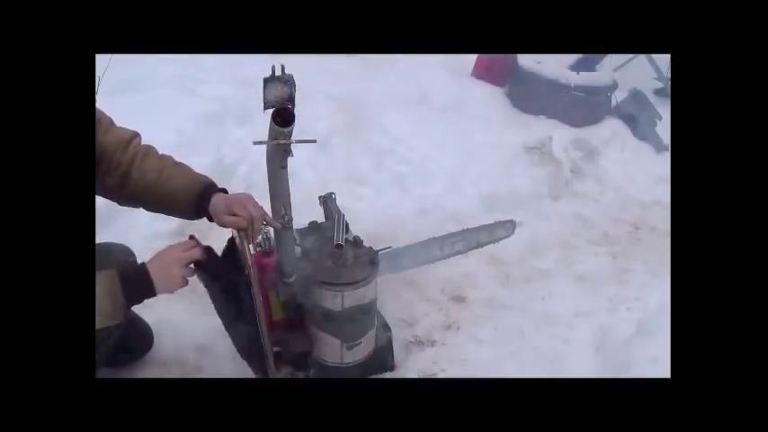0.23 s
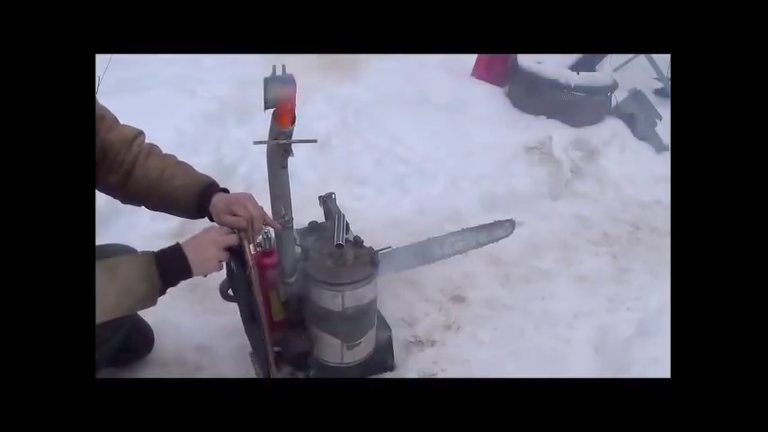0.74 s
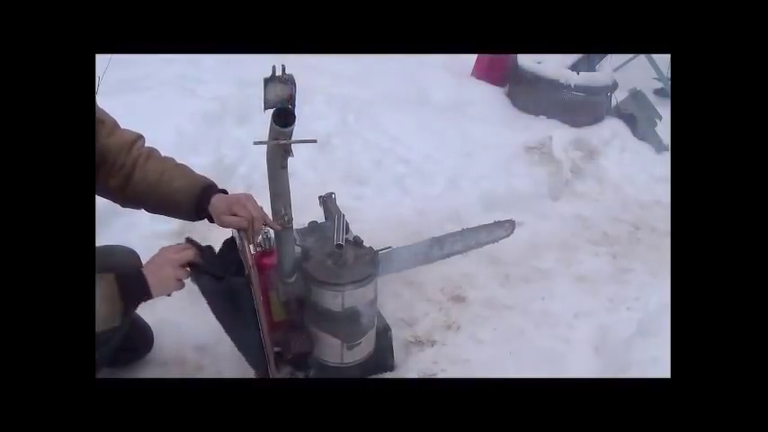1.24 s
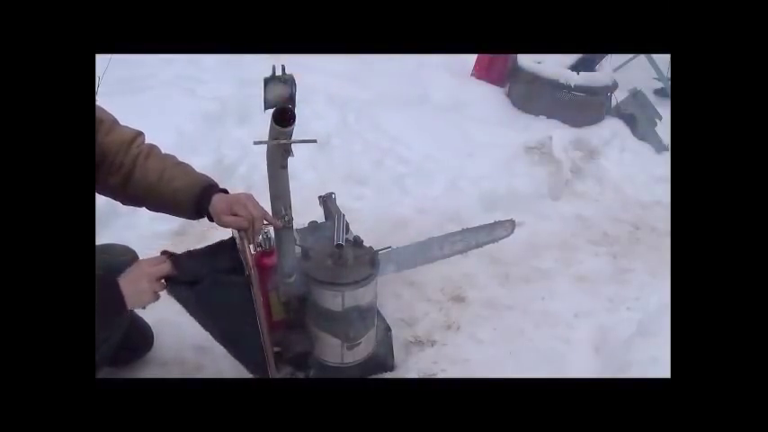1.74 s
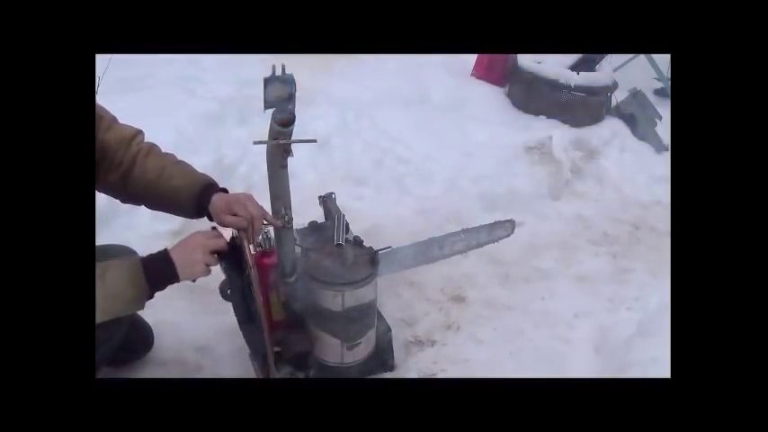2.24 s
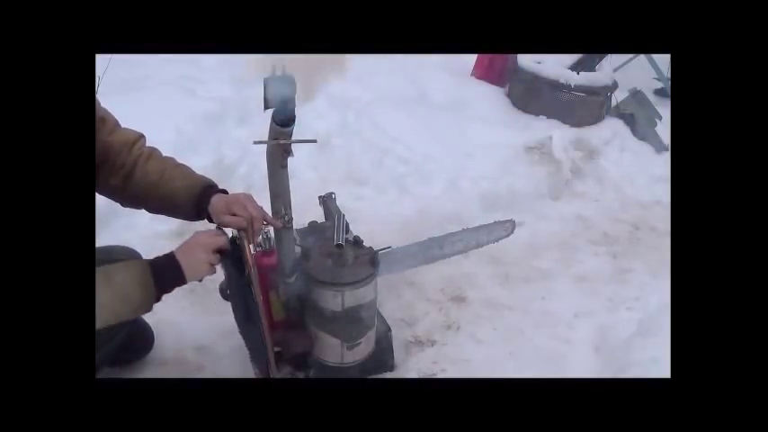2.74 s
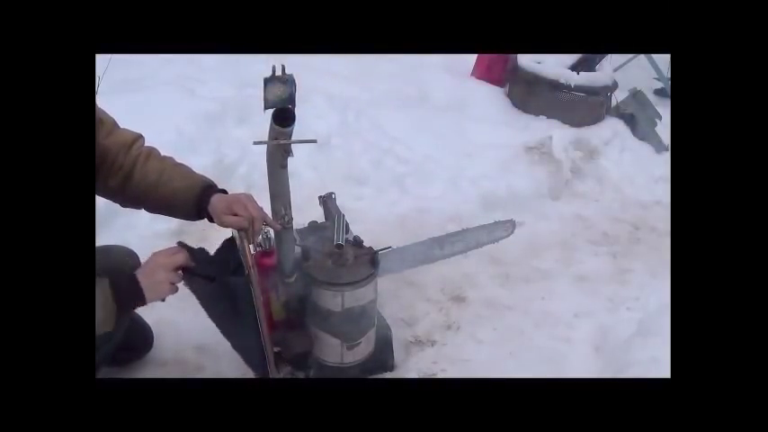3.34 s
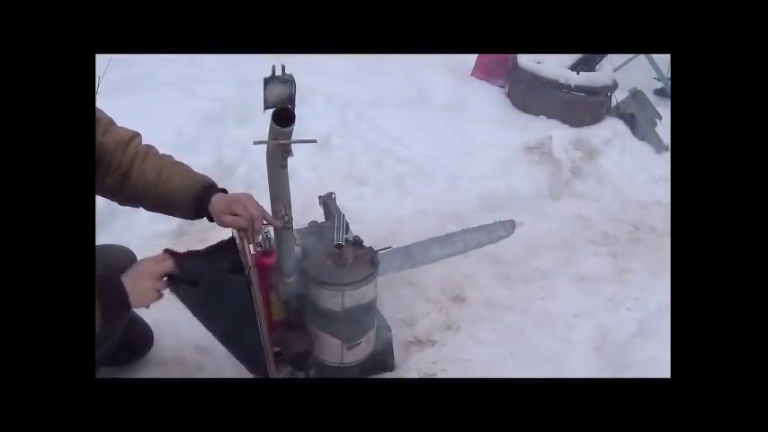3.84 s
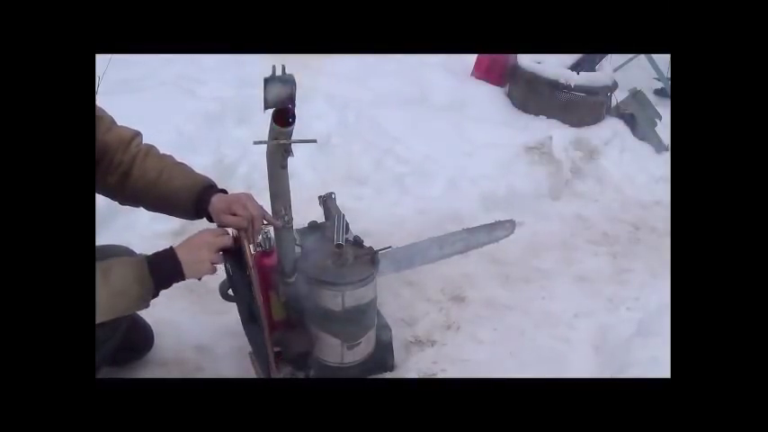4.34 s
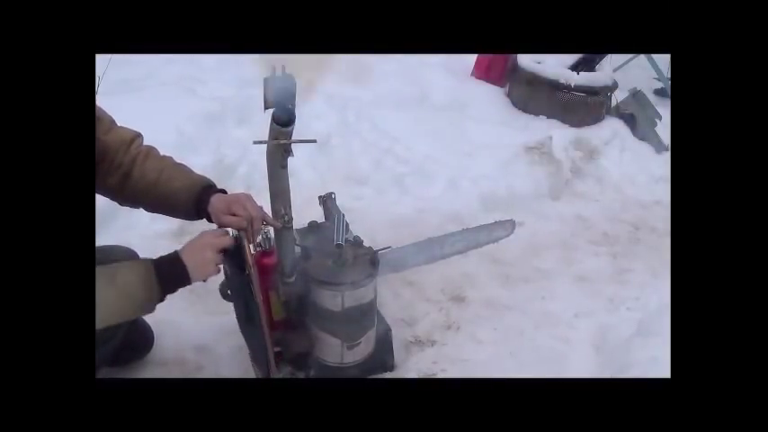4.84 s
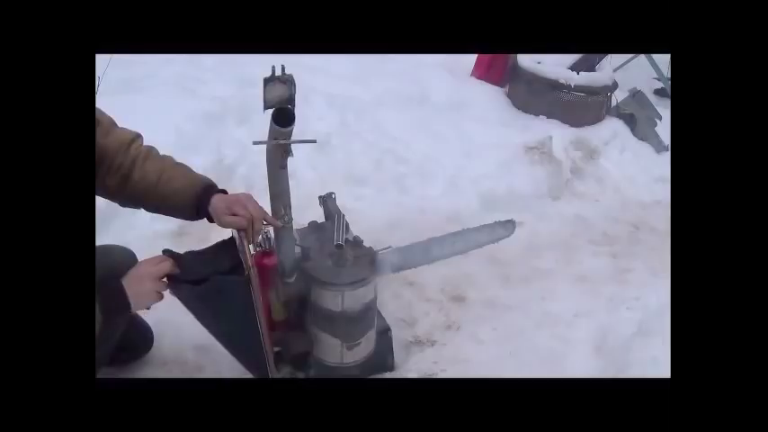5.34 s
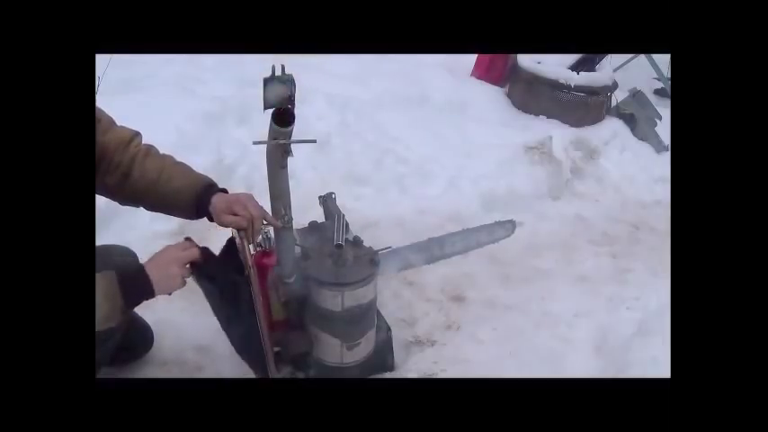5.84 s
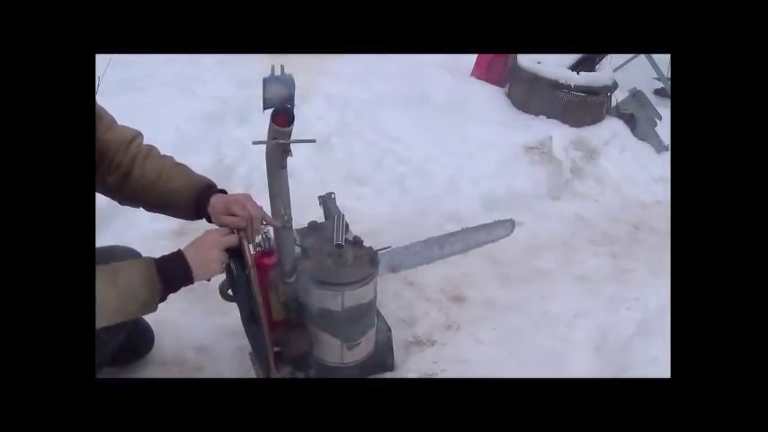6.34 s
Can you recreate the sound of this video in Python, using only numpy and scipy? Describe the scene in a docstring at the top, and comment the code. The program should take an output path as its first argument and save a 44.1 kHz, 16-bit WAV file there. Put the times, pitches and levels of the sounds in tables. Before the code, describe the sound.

Steady pumping of leathery cloth bellows beside a burning stove in quiet open air. Short, rough whooshes with a low fire rumble alternate with lighter sucking breaths of air, flap slaps, dry cloth snaps and small metallic clicks. A brief airy hoot from the pipe follows every blast, and a few dry ember cracks stand out, one strongest near the middle. Close two-channel microphone, slightly wide, no echo, faint hiss between strokes.

```python
"""The roar of a dying air blast comes first, with a hoot from the flue and a cracking ember.
Hand bellows feed a small steel stove in open air, about one stroke every 0.7 s: shaped noise is the air and fire.
On each pull the flap claps, air is drawn in, and the cloth snaps out and pulls taut; on the turn the fittings click.
On each squeeze the cloth folds and the jet roars again. These contacts are short clicks ringing decaying modes."""
import sys
import numpy as np
from scipy import signal
from scipy.fft import rfft, irfft, next_fast_len
from scipy.io import wavfile

SR = 44100
rng = np.random.default_rng(int(sys.argv[2]) if len(sys.argv) > 2 else 0)


def transcribe(signal):
    """Save signal, clipped to [-1, 1], as a 16-bit WAV file at the path in sys.argv[1]."""
    frames = np.atleast_2d(signal).T
    limited = np.clip(frames, -1, 1)
    pcm = np.round(limited * 32767).astype(np.int16)
    wavfile.write(sys.argv[1], SR, pcm)


N = 290044   # length in samples, about 6.6 s


def from_db(db):
    """Turns decibels into an amplitude factor."""
    return 10 ** (np.asarray(db) / 20)


def rms_one(x):
    """Scales a signal to an rms of 1."""
    return x / np.sqrt(np.mean(x ** 2) + 1e-20)


def seconds():
    """The time of every sample."""
    return np.arange(N) / SR


def at_hz(points, hz):
    """Reads a table on a log-frequency axis."""
    known_hz, values = np.transpose(points)
    return np.interp(np.log(hz + 1), np.log(known_hz + 1), values)


def drift(rate_hz):
    """Slow random wandering with a spread of 1, made at an eighth of the sample rate."""
    size = next_fast_len(N // 8 + 2, real=True)
    hz = np.fft.rfftfreq(size, 8 / SR)
    spectrum = rfft(rng.standard_normal(size)) / (1 + (hz / rate_hz) ** 2)
    slow = rms_one(irfft(spectrum, size))
    return np.interp(np.arange(N) / 8, np.arange(size), slow)


def air_noise(spectrum, peaks):
    """Turbulence: white noise given a broad colour and a few resonances; rms 1."""
    size = next_fast_len(N, real=True)
    hz = np.fft.rfftfreq(size, 1 / SR)
    colour_db = at_hz(spectrum, hz)
    for centre_hz, width_hz, db in peaks:
        colour_db = colour_db + db / (1 + ((hz - centre_hz) / (width_hz / 2)) ** 2)
    return rms_one(irfft(rfft(rng.standard_normal(size)) * from_db(colour_db), size)[:N])


def split(x, hz):
    """The parts below and above a crossover."""
    return [signal.sosfilt(signal.butter(4, hz, kind, fs=SR, output="sos"), x) for kind in ("low", "high")]


def blows(events, modes, rise_s, rustle_db, rustle_s, gain_db):
    """Each contact is a click and a dying rustle, ringing the modes a little differently every time."""
    t = np.arange(SR // 6) / SR
    hz, level_db, t60_s = np.transpose(modes)[:, :, None]
    partials = from_db(level_db - 60 * t / t60_s) * np.sin(2 * np.pi * hz * t)
    out = np.zeros(N + len(t))
    for s, event_db in events:
        ring = np.sum(from_db(rng.normal(0, 1.0, hz.shape)) * partials, axis=0)
        ring *= 1 - np.exp(-t / rise_s)   # soft things take a moment to get moving
        rustle_shape = np.exp(-t / rustle_s) * (1 - np.exp(-2 * t / rustle_s))
        contact = from_db(rustle_db) * rng.standard_normal(len(t)) * rustle_shape
        contact[0] = 1   # the click itself
        start = round(s * SR)
        if 0 <= start < N:
            sound = signal.fftconvolve(contact, ring / np.abs(ring).max())[:len(t)]
            out[start:start + len(t)] += from_db(event_db + gain_db) * sound
    return out[:N]


# colour of the quiet between strokes: hz, density_db (relative, per Hz)
QUIET_COLOUR = [(20, -36), (40, -21), (70, -13), (130, -8), (260, -7), (500, 1), (1200, -5), (2000, -10),
                (3200, -10.5), (5000, -17.5), (7500, -17), (10500, -14), (13000, -25), (16000, -29)]
# its resonances: centre_hz, width_hz, boost_db
QUIET_RESONANCES = [(125, 14, 1.3), (1510, 92, 5), (11000, 450, 3.5)]


def quiet_air():
    """A faint, wavering noise bed under everything."""
    return from_db(-45.8 + 2.5 * drift(rate_hz=100)) * air_noise(QUIET_COLOUR, QUIET_RESONANCES)


# each squeeze, levels relative: start_s, end_s, blast_db, hoot_db, flare_db
SQUEEZE_STROKES = [(-0.11, 0.05, -22, -26, -18), (0.59, 0.756, -21.5, -29, -11),
                   (1.2762, 1.451, -22, -27, -15), (1.98, 2.149, -21, -32, -16),
                   (2.681, 2.859, -19.5, -28, -10), (3.392, 3.571, -20, -23.5, -22),
                   (4.099, 4.272, -19.5, -31.5, -18), (4.788, 4.947, -19.5, -21, -21),
                   (5.4823, 5.648, -21, -24, -14), (6.1878, 6.35, -19.1, -27, -20)]


def squeeze_gain(attack, full_from, full_until, release, curve):
    """Swell, hold and fade of every squeeze, in shares of its length; curve 1 is exponential, 2 bell-shaped."""
    t, gain = seconds(), np.zeros(N)
    for start, end, level_db, _, _ in SQUEEZE_STROKES:
        near = np.abs(t - (start + end) / 2) < .35
        share = (t[near] - start) / (end - start)
        away = np.maximum(full_from - share, 0) / attack + np.maximum(share - full_until, 0) / release
        gain[near] += from_db(level_db) * np.exp(-away ** curve)
    return gain


def rush_gain():
    """The flow through the stove swells to the middle of a squeeze and falls away."""
    return squeeze_gain(attack=.3, full_from=0.49, full_until=.62, release=.26, curve=1.9)


# colour of the blast: hz, density_db (relative, per Hz)
JET_COLOUR = [(18, -56), (30, -45), (124, -4), (336, -10), (473, -10.5), (600, -5), (1160, -2),
              (2230, -12.5), (3980, -11.5), (4420, -8), (5450, -17.5), (6210, -15.5), (7670, -18.5),
              (10500, -12.5), (16000, -39.5)]
# resonances of the blast, with the microphone's broad hump near 10 kHz: centre_hz, width_hz, boost_db
JET_RESONANCES = [(141, 39, 2), (460, 28, 12), (633, 85, -8), (1140, 35, 3.5), (1470, 180, 4.5),
                  (1930, 730, -4), (3534, 140, 6), (3980, 48, -7), (4420, 310, 5.5), (4860, 120, 5.5),
                  (6100, 240, 6), (7650, 740, -4), (10200, 1700, 2)]


def blast(hiss_db=2.0, rush_db=6.0, rumble_db=-4.6, afterburn_db=-18.3, flutter_db=0.7, flame_db=3.3):
    """The nozzle hisses, the air rushes through the stove and the fanned flame rumbles on a little longer."""
    rumble = split(air_noise(JET_COLOUR, JET_RESONANCES), hz=467)[0]
    rush = split(split(air_noise(JET_COLOUR, JET_RESONANCES), hz=410)[1], hz=2550)[0]
    hiss = split(air_noise(JET_COLOUR, JET_RESONANCES), hz=2430)[1]
    hiss_gain = from_db(hiss_db) * squeeze_gain(
        attack=.28, full_from=.49, full_until=.76, release=.16, curve=1.7)
    rumble_gain = from_db(rumble_db) * squeeze_gain(
        attack=0.066, full_from=0.038, full_until=0.83, release=0.14, curve=1.5)
    afterburn_gain = from_db(afterburn_db) * squeeze_gain(
        attack=.12, full_from=-0.23, full_until=1.28, release=0.13, curve=0.84)
    flutter = from_db(flutter_db * drift(rate_hz=140))   # hiss and rush waver together
    jet = hiss_gain * rms_one(hiss) + from_db(rush_db) * rush_gain() * rms_one(rush)
    flicker = from_db(flame_db * drift(rate_hz=70))
    flame = flicker * np.maximum(rumble_gain, afterburn_gain) * rms_one(rumble)
    return flutter * jet + flame


# the stove's main resonance rises a little, then sinks through the squeeze: stroke_share (0 to 1), pitch_hz
THROAT_GLIDE = [(.2, 1113), (.5, 1163), (.75, 1068), (1, 946.6)]


def throat(level_db=-3.2, width_hz=45.0):
    """The rush excites a narrow resonance that glides with every stroke."""
    times = [start + share * (end - start)
             for start, end, *_ in SQUEEZE_STROKES for share, _ in THROAT_GLIDE]
    pitches_hz = [hz for _, hz in THROAT_GLIDE] * len(SQUEEZE_STROKES)
    phase = 2 * np.pi * np.cumsum(np.interp(seconds(), times, pitches_hz)) / SR
    narrow_noise = drift(width_hz) * np.sin(phase) + drift(width_hz) * np.cos(phase)
    return from_db(level_db) * rush_gain() * narrow_noise


def flue(low_hz=470, high_hz=600, glide_s=0.0165, swell_s=.027, fade_s=0.021, octave_db=-7.0,
         octave_lead_s=0.014, boom_hz=130, boom_db=-3.5, boom_s=0.041, waver=0.031):
    """The first two pipe resonances glide up as the blast ends, over the boom of the fire chamber."""
    t, out = seconds(), np.zeros(N)
    wobble, boom_wobble = 1 + waver * drift(rate_hz=165), 1 + 0.122 * drift(rate_hz=21.0)
    # turbulence shakes the strength and phase of each resonance, so it sounds airy
    low_gain, octave_gain, boom_gain = [
        .75 + .45 * (drift(rate) + 1j * drift(rate)) for rate in (70, 90, 30)]
    for _, end, _, hoot_db, _ in SQUEEZE_STROKES:
        s = end + .025   # the flue answers just after the squeeze
        near = np.abs(t - s) < .2
        age = t[near] - s
        hz = (low_hz + (high_hz - low_hz) / (1 + np.exp(-age / glide_s))) * wobble[near]
        turn = np.exp(2j * np.pi * np.cumsum(hz) / SR)
        swell, early_swell = [np.exp(-.5 * (a / np.where(a < 0, swell_s, fade_s)) ** 2)
                              for a in (age, age + octave_lead_s)]
        low = swell * low_gain[near] * turn
        octave = from_db(octave_db) * early_swell * octave_gain[near] * turn ** 2
        boom_turn = np.exp(2j * np.pi * np.cumsum(boom_hz * boom_wobble[near]) / SR)
        boom = np.exp(-.5 * (age / boom_s) ** 2) * boom_gain[near] * boom_turn
        out[near] += from_db(hoot_db) * np.imag(low + octave + from_db(boom_db) * boom)
    return out


# the fire chamber's ring: pitch_hz, level_db (relative), t60_s
CHAMBER_MODES = [(67.6, -24, 0.033), (119, 1.5, 0.06), (162, -1, 0.039)]


def flares(height_share=.64, spread_s=.012, last_after_s=0.0191, last_db=-6.5):
    """The fanned flame puffs low near the height of each squeeze and more weakly just after its end."""
    first = [(start + height_share * (end - start) + spread_s * rng.standard_normal(), db)
             for start, end, _, _, db in SQUEEZE_STROKES]
    last = [(end + last_after_s, db + last_db) for _, end, _, _, db in SQUEEZE_STROKES]
    return blows(first + last, CHAMBER_MODES, rise_s=0.0027, rustle_db=-35, rustle_s=0.0065, gain_db=-0.6)


# each cracking ember, levels relative: start_s, level_db, ring_hz, ring_db
EMBER_CRACKS = [(0.0754, -23, 7900, -3), (3.5843, -8.5, 8050, 5), (3.643, -25.5, 7000, -14),
                (4.3104, -21.5, 4580, 1), (4.339, -17, 10400, -19), (5.036, -17, 9700, -8),
                (5.689, -25, 7040, -15), (6.411, -17.5, 9940, -12)]
# the crack they share: pitch_hz, level_db (relative), t60_s
EMBER_MODES = [(4530, -7, .004), (7000, -1.5, .003), (10430, 9, 0.0025), (12800, -8, .002)]


def embers(ring_t60_s=0.0082):
    """Each ember gives a dry crack with a short ring of its own."""
    out = np.zeros(N)
    for s, db, hz, ring_db in EMBER_CRACKS:
        modes = EMBER_MODES + [(hz, ring_db, ring_t60_s)]
        out += blows([(s, db)], modes, rise_s=.00005, rustle_db=-24, rustle_s=0.0022, gain_db=-1.5)
    return out


# each pull: flap_opens_s, cloth_snaps_out_s, cloth_taut_s, strength_db (relative)
PULL_STROKES = [(0.2176, .2915, .423, -11), (0.9178, .9959, 1.1046, -8), (1.6004, 1.6788, 1.7898, -8),
                (2.2983, 2.3754, 2.5052, -7), (3.0279, 3.106, 3.2137, -4.5), (3.7199, 3.7941, 3.9145, -7),
                (4.4215, 4.5004, 4.6211, -6), (5.1087, 5.1917, 5.3227, -8.5), (5.806, 5.8821, 6.005, -9.3),
                (6.5088, 6.585, 6.71, -7.5)]
# the flap chatters as it opens: delay_s, level_db (relative to the pull)
FLAP_CHATTER = [(-.0004, -6.5), (.0016, -1), (.0054, -10.5), (.0088, -10.5), (0.0171, -8.5)]
# the flap's ring: pitch_hz, level_db (relative), t60_s
FLAP_RING = [(135, -48, 0.046), (332.5, -21, 0.13), (455, -5, 0.024), (581, 3, 0.021), (750, -7.5, 0.03),
             (1075, -2.5, 0.014), (1225, -8.5, 0.023), (1556, -17.5, 0.021), (2450, -25, 0.009),
             (10400, -27, 0.016)]
# soft pat, also of loose cloth against the boards: pitch_hz, level_db (relative), t60_s
PAT_RING = [(162, -24.5, 0.15), (256, 1.5, 0.027), (343, 10, 0.016), (740, -11, 0.036), (1290, -10, 0.01)]


def flap(rebound_s=0.034):
    """The intake flap chatters open at the start of each pull and falls back once."""
    slaps = [(s + delay, db + slap_db) for s, _, _, db in PULL_STROKES for delay, slap_db in FLAP_CHATTER]
    rebounds = [(s + rebound_s, db) for s, _, _, db in PULL_STROKES]
    return (blows(slaps, FLAP_RING, rise_s=0.0011, rustle_db=-35.5, rustle_s=0.022, gain_db=2.0)
            + blows(rebounds, PAT_RING, rise_s=0.00074, rustle_db=-27, rustle_s=0.01, gain_db=-8.5))


# colour of the air drawn in: hz, density_db (relative, per Hz)
INTAKE_COLOUR = [(24, -49), (40, -14), (363, 1), (542, -6), (751, 8), (918, 2), (1150, 0.5), (2100, -7),
                 (2500, -8.5), (2770, -10.5), (5440, -17.5), (6020, -18), (8340, -20.5), (10400, -11.5),
                 (16000, -41)]
# resonances of the drawn air, with the microphone's broad hump near 10 kHz: centre_hz, width_hz, boost_db
INTAKE_RESONANCES = [(710, 46, 2.3), (1230, 110, 3.6), (2510, 140, 6.4), (3270, 370, 4.1),
                     (10100, 2200, 1.33)]


def intake(level_db=-29.6, open_s=0.0014, close_s=0.02, peak_db=0.9, flutter_db=1.6):
    """Air is drawn past the flap from its clap until the cloth is taut, fastest about 70 % of the way."""
    t, flow = seconds(), np.zeros(N)
    for start, _, taut, pull_db in PULL_STROKES:
        opening = 1 - np.exp(-np.maximum(t - start, 0) / open_s)
        closing = np.exp(-np.clip((t - taut) / close_s, 0, 20))
        speed = np.sin(np.pi * np.clip((t - start) / (taut - start), 0, 1) ** 2)
        flow += from_db(.5 * pull_db + peak_db * speed) * opening * closing   # a harder pull draws more air
    flutter = from_db(level_db + flutter_db * drift(rate_hz=18))
    return flutter * flow * air_noise(INTAKE_COLOUR, INTAKE_RESONANCES)


# the folding cloth's ring: pitch_hz, level_db (relative), t60_s
FOLD_RING = [(140, -39, 0.019), (266, 0.5, 0.033), (368, -1.5, 0.041), (714, -2.5, 0.062), (1137, 8, 0.013),
             (1550, 9.5, 0.0053), (2660, -3.5, 0.013)]


def creases(squeeze_db=-20.0, pull_db=-33.0, spread_db=9.0, early_s=.02, late_s=.058, count=7):
    """Small creases crackle at random while the cloth takes up the pressure, and faintly while it unfolds."""
    spans = [(s - early_s, early_s + late_s, squeeze_db) for s, *_ in SQUEEZE_STROKES]
    spans += [(s, taut - s, pull_db) for s, _, taut, _ in PULL_STROKES]
    draws = rng.random((len(spans), count, 2))
    events = [(s + when * length, db + spread_db * (2 * size - 1))
              for (s, length, db), rows in zip(spans, draws) for when, size in rows]
    return blows(events, FOLD_RING, rise_s=.0001, rustle_db=-20, rustle_s=0.0017, gain_db=-3.0)


# slack cloth snapping outward: pitch_hz, level_db (relative), t60_s
SNAP_RING = [(231, -7.5, 0.13), (496, 3, 0.026), (790, -2.5, 0.02), (1310, 6, 0.0044), (1657, 9.5, 0.0082),
             (2350, 15.5, 0.0021), (3400, -1, 0.0038), (4320, -21, 0.012), (10300, -25, .003)]
# cloth pulling taut: pitch_hz, level_db (relative), t60_s
TAUT_RING = [(140, -51, 0.086), (319, -23, 0.051), (505, -2.5, 0.017), (755, 0.5, 0.017), (920, 7, 0.0041),
             (1670, 3, 0.0043), (2850, -24, 0.02), (3620, -13.5, 0.0058)]


def cloth_opening(early_pat_db=-16.0, late_pat_db=-16.5, after_snap_s=0.026, before_taut_s=.015):
    """In each pull the cloth snaps outward, pats the boards and pulls taut, all as hard as the pull."""
    snaps = [(s, db) for _, s, _, db in PULL_STROKES]
    stretches = [(s, db) for _, _, s, db in PULL_STROKES]
    pats = [(s + after_snap_s, db + early_pat_db) for s, db in snaps]
    pats += [(s - before_taut_s, db + late_pat_db) for s, db in stretches]
    return (blows(stretches, TAUT_RING, rise_s=0.00089, rustle_db=-31.5, rustle_s=0.0086, gain_db=2.0)
            - blows(snaps, SNAP_RING, rise_s=0.0001, rustle_db=-29.0, rustle_s=0.011, gain_db=4.5)
            + blows(pats, PAT_RING, rise_s=0.0017, rustle_db=-43, rustle_s=.008, gain_db=0.0))


# each turn from pull to squeeze, levels relative: tick_s, click_s, click_db, knock_s, knock_db
HANDLE_TURNS = [(0.4733, .5032, -12, .5255, -12), (1.1638, 1.1893, -11, 1.2, -8),
                (1.8504, 1.8787, -16.5, 1.883, -15.5), (2.5761, 2.6, -7.5, 2.614, -13),
                (3.2984, 3.3148, -10, 3.318, -23), (3.9799, 4.0372, -24, 3.999, -20),
                (4.6642, 4.6893, -7, 4.695, -17), (5.3614, 5.3871, -9, 5.4072, -12.5),
                (6.0709, 6.0921, -10, 6.1152, -11.5)]
# the metal fittings' ring: pitch_hz, level_db (relative), t60_s
CLICK_RING = [(440, -14, 0.027), (1122, -8, 0.03), (1750, -4.5, 0.0075), (2310, 0.5, 0.0047),
              (3610, 1.5, 0.0052), (4550, 0.5, 0.0053), (5950, -3, 0.0054), (7000, 6, 0.0027),
              (9740, 8.5, 0.0024), (10970, 3.5, 0.0039)]
# the board's ring: pitch_hz, level_db (relative), t60_s
KNOCK_RING = [(370, -22.5, 0.11), (760, -17, 0.042), (1194, -5, 0.0074), (1670, 9, 0.0026),
              (2550, -12, 0.0051)]


def handle(tick_db=-19.5):
    """On the turn the loose fittings tick and click home, and the board knocks on its hinge."""
    clicks = [(s, tick_db) for s, *_ in HANDLE_TURNS] + [(s, db) for _, s, db, _, _ in HANDLE_TURNS]
    knocks = [(s, db) for *_, s, db in HANDLE_TURNS]
    return (blows(clicks, CLICK_RING, rise_s=0.00025, rustle_db=-10, rustle_s=0.0018, gain_db=-4.5)
            + blows(knocks, KNOCK_RING, rise_s=.0001, rustle_db=-25, rustle_s=0.0041, gain_db=3.5))


# the cloth buckles three times as a squeeze begins: delay_s, level_db (relative), timing_spread_s
CLOTH_BUCKLES = [(-.016, -14, .002), (0, -5, 0), (.0215, -9.5, .0015)]
# cloth rubbing on itself: pitch_hz, level_db (relative), t60_s
RUB_RING = [(1520, -10, 0.0039), (1970, 5, 0.0036), (3020, -3, .002), (10000, -14, .001)]


def cloth_folding(pat_before_s=.05, rub_before_s=.045):
    """The slackening cloth pats and rubs on itself, then buckles as the squeeze begins."""
    pats = [(s - pat_before_s, db) for s, _, db, _, _ in SQUEEZE_STROKES]
    rubs = [(s - rub_before_s, db) for s, _, db, _, _ in SQUEEZE_STROKES]
    folds = [(s + delay + spread * rng.standard_normal(), db)
             for s, *_ in SQUEEZE_STROKES for delay, db, spread in CLOTH_BUCKLES]
    return (blows(pats, PAT_RING, rise_s=0.0018, rustle_db=-45, rustle_s=.008, gain_db=-8.5)
            + blows(rubs, RUB_RING, rise_s=0.00091, rustle_db=1, rustle_s=.006, gain_db=-24.5)
            - blows(folds, FOLD_RING, rise_s=.0004, rustle_db=-17, rustle_s=.003, gain_db=-1.0))


# strength of a short diffuse spread added with opposite sign at the two ports,
# strongest near 7.4 kHz: hz, level_db
SPREAD_COLOUR = [(60, -16), (1300, -20), (2300, -18), (4500, -35), (5800, -24), (7400, -8), (8000, -14),
                 (8700, -33), (15000, -28)]


def diffuse_spread(size, t60_s=.07, build_s=.004):
    """Frequency response of a short burst of decaying noise that widens the sound."""
    t = np.arange(SR // 4) / SR
    burst = rng.standard_normal(len(t)) * from_db(-60 * t / t60_s) * (1 - np.exp(-(t / build_s) ** 2))
    colour = from_db(at_hz(SPREAD_COLOUR, np.fft.rfftfreq(size, 1 / SR)))
    return rfft(burst / np.linalg.norm(burst), size) * colour


# phase between the two ports: hz, left_lead_rad
LEFT_LEAD = [(40, -.4), (130, -.78), (460, -.95), (1000, -.58), (1600, -.22), (3200, 0)]
# level between the two ports: hz, left_minus_right_db
LEFT_BALANCE = [(60, 0), (200, -.7), (480, -1.7), (1150, -1.9), (1800, -.2), (6000, .1), (7400, 2.5),
                (8400, 0)]


def two_ports(sound):
    """Two microphone ports share the phase and level difference equally; the spread has opposite signs."""
    size = next_fast_len(N + SR // 4, real=True)
    spectrum, hz = rfft(sound, size), np.fft.rfftfreq(size, 1 / SR)
    port = from_db(at_hz(LEFT_BALANCE, hz) / 2) * np.exp(.5j * at_hz(LEFT_LEAD, hz))
    spread = diffuse_spread(size)
    open_air = from_db(-60.0) * air_noise(QUIET_COLOUR, QUIET_RESONANCES)   # opposite sign at the ports
    left = irfft(spectrum * (port + spread), size)[:N] + open_air
    right = irfft(spectrum * (1 / port - spread), size)[:N] - open_air
    return np.array([left, right])


def scene():
    """Everything sounds close by in open air, heard through two ports a little apart."""
    stove = blast() + throat() + flue() + flares() + embers()
    bellows = flap() + intake() + creases() + cloth_opening() + handle() + cloth_folding()
    return two_ports(quiet_air() + stove + bellows)


def record(dry, low_cut_hz=45.0, high_cut_hz=16000):
    """The deepest bass is lost, the highest peaks are rounded and the top is cut."""
    thin = signal.sosfilt(signal.butter(2, low_cut_hz, "high", fs=SR, output="sos"), dry)
    rounded = thin / (1 + thin ** 6) ** (1 / 6)
    return signal.sosfilt(signal.ellip(10, .1, 80, high_cut_hz, fs=SR, output="sos"), rounded)


dry = scene()
out = record(dry)
transcribe(out)
```